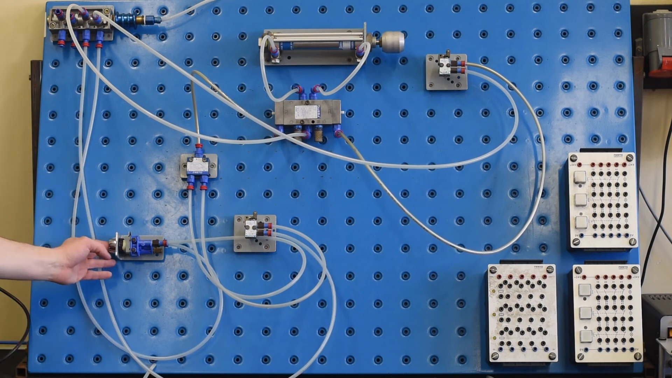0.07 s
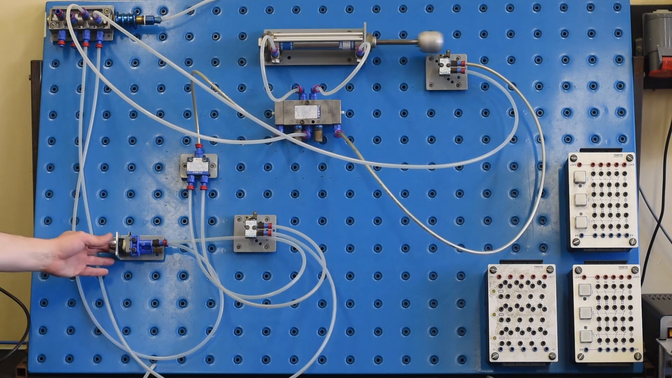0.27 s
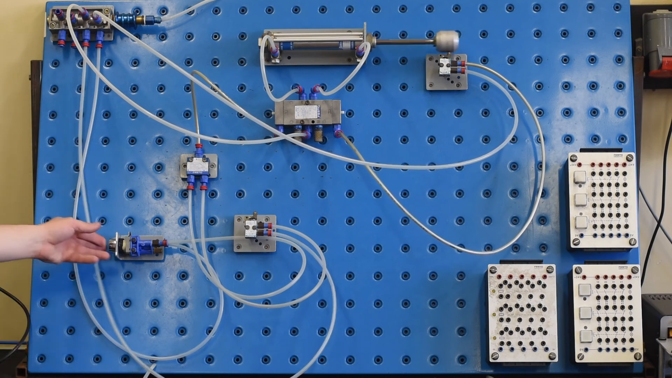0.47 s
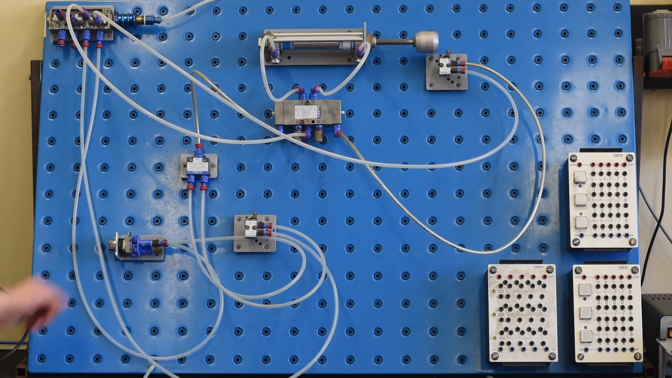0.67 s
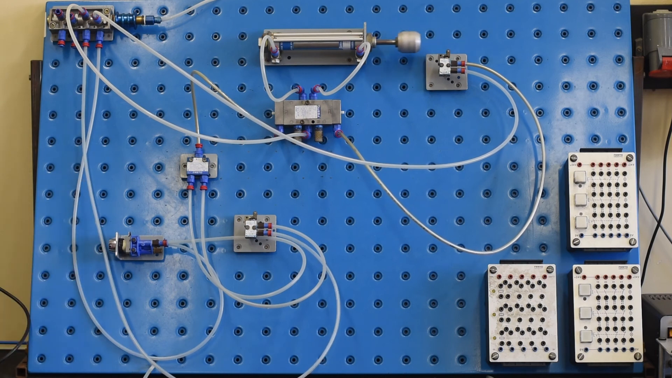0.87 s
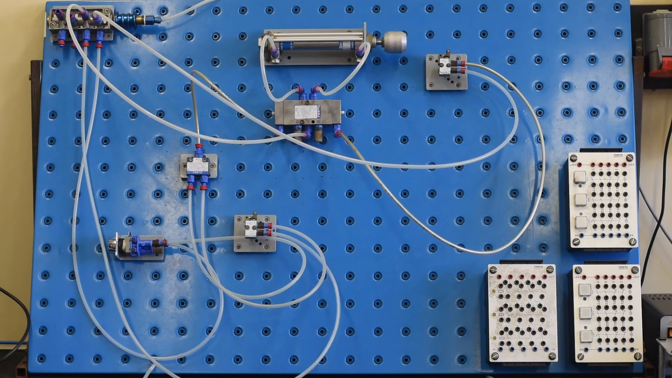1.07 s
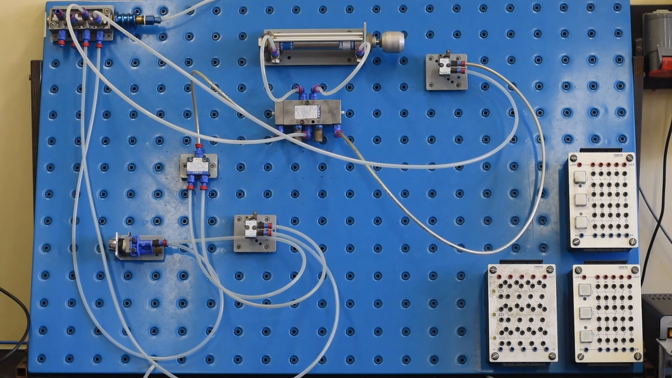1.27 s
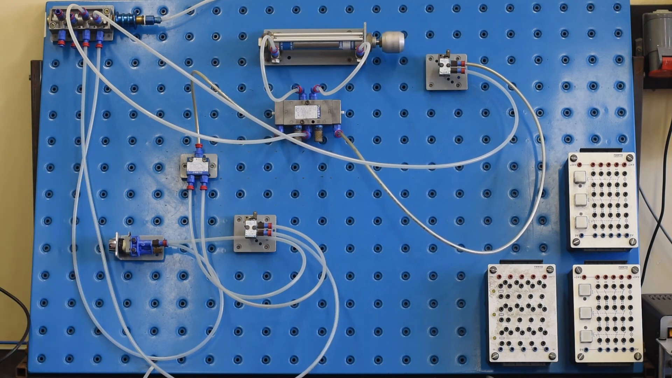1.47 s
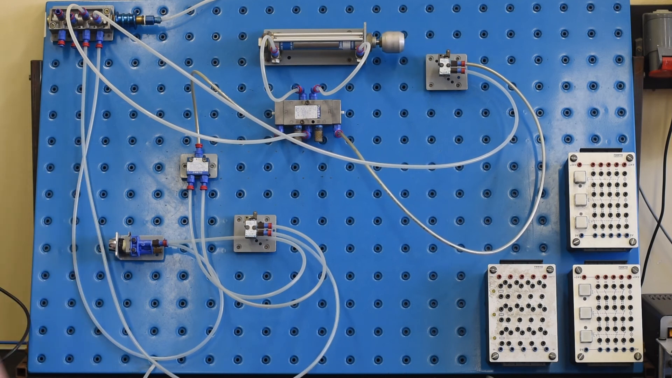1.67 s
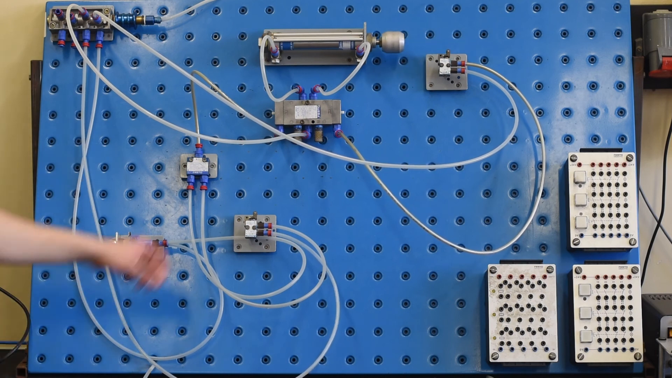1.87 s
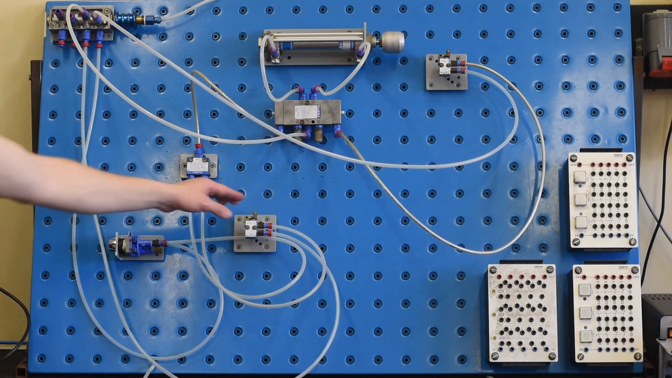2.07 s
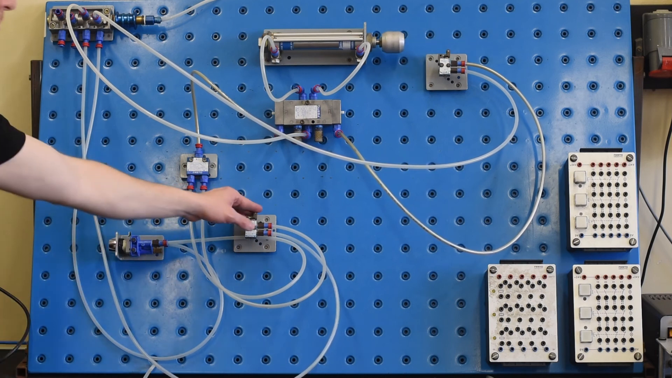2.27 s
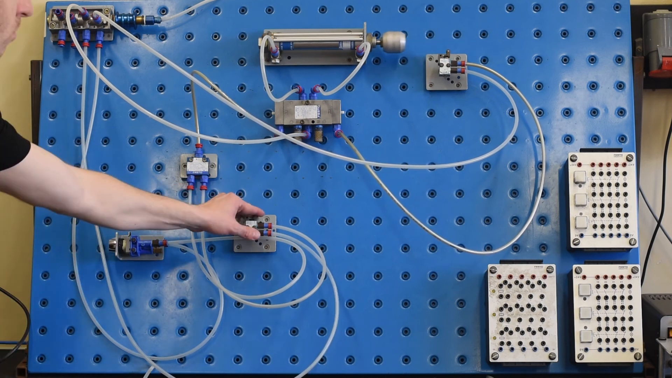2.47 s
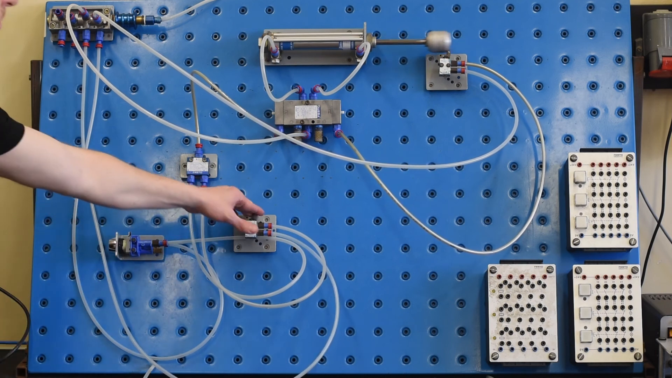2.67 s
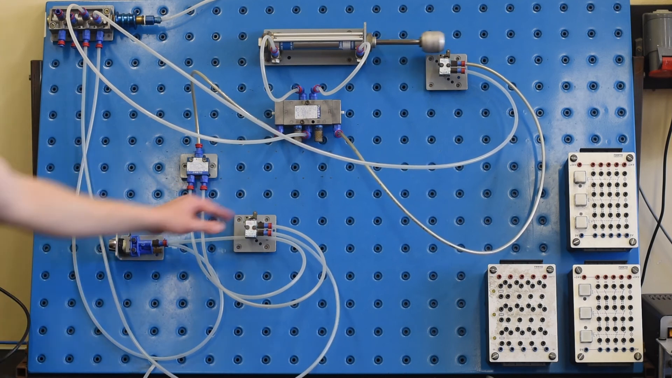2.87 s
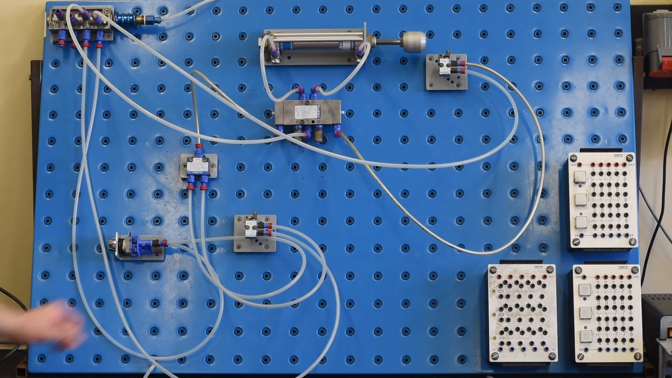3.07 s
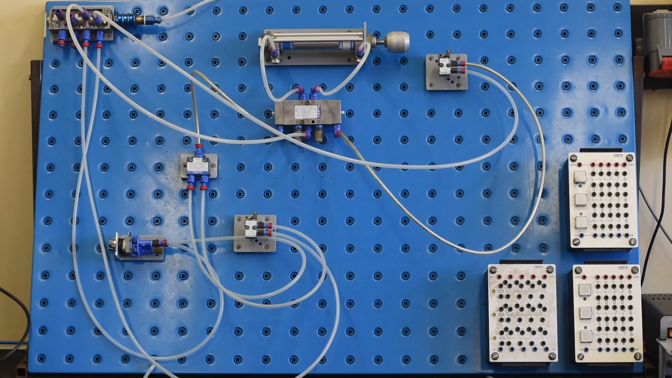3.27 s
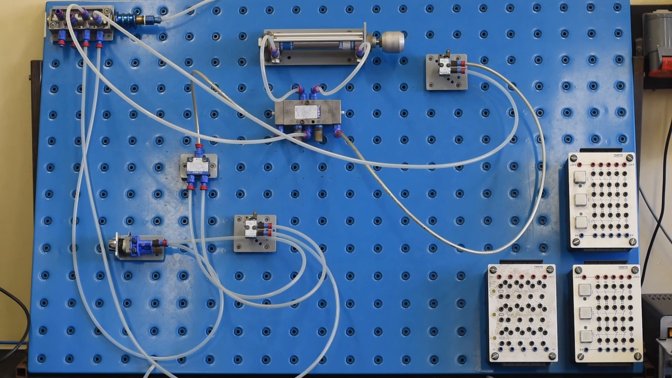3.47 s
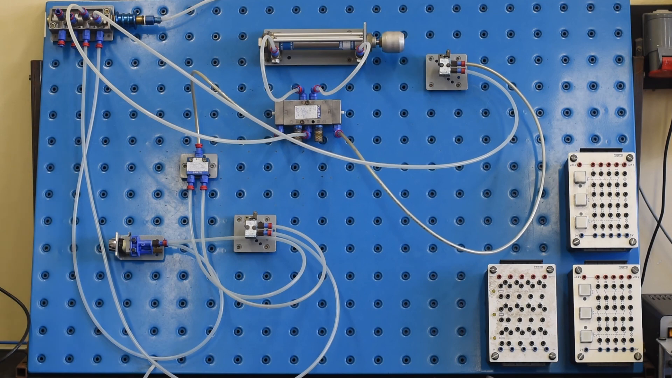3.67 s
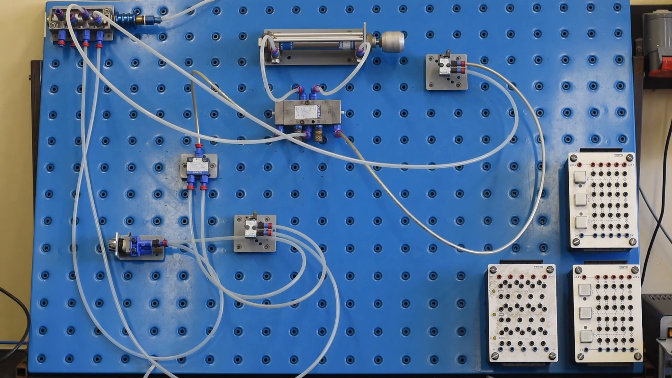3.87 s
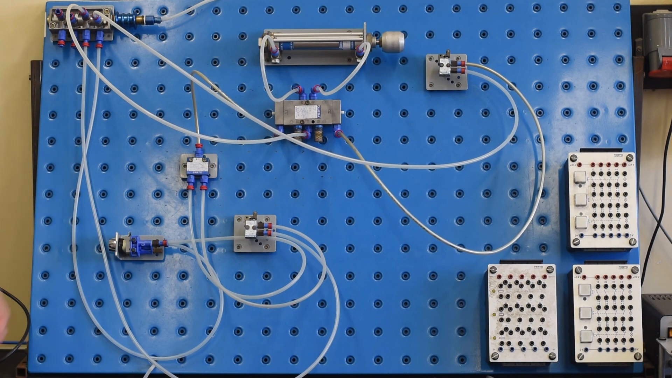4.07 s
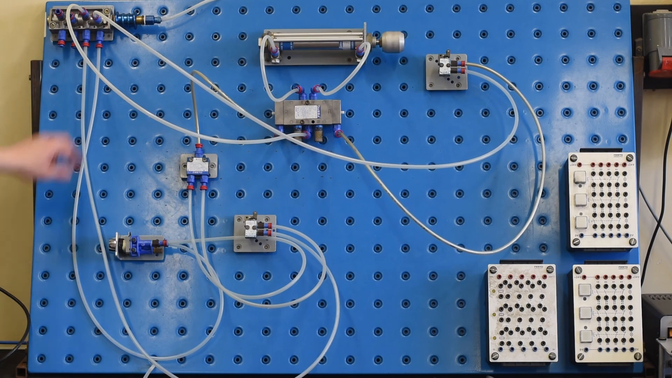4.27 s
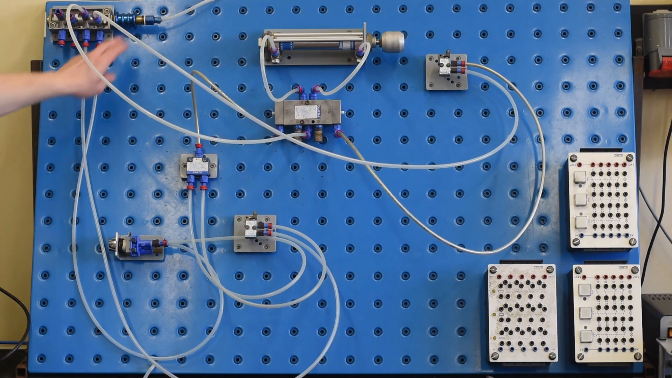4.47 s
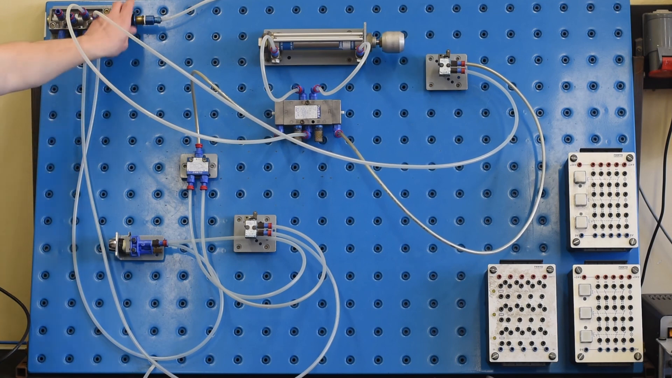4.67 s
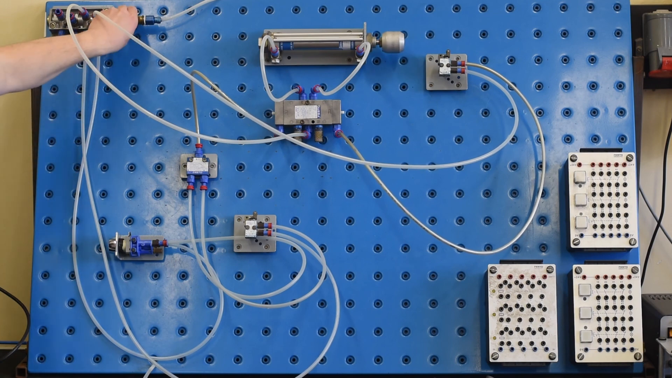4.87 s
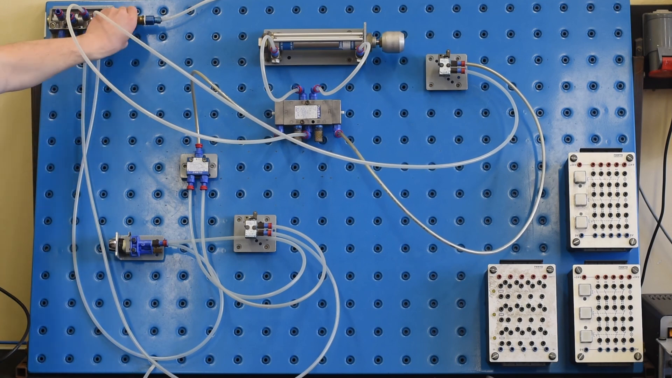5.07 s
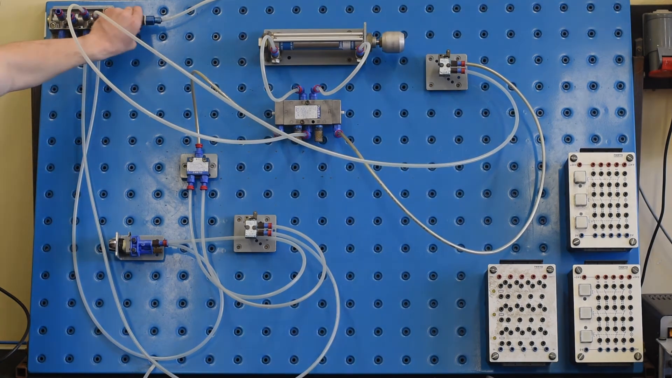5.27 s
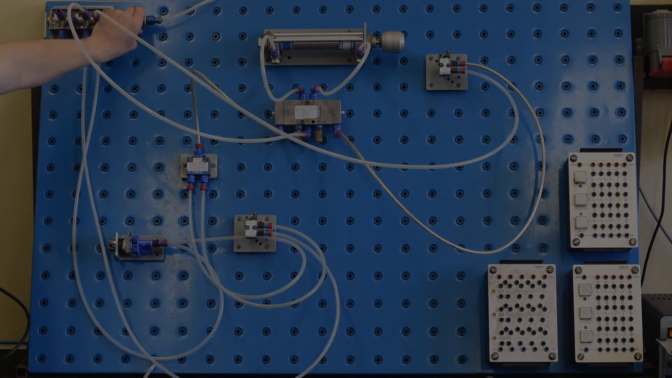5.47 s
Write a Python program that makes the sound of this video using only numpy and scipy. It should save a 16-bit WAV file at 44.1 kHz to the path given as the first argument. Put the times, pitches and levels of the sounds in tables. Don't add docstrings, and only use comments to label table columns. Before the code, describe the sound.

A hand works small valves on a perforated metal board in a reverberant lab. A sharp clack, thin hiss, end knock and air puff mark the cylinder's out-stroke; a softer knock marks its return. The cycle repeats with a brighter spit of air. Last, the supply valve vents in a very loud, distorted blast. A faint leak hiss and low room hum run underneath, heard in stereo from a few metres away.

```python
import sys
import numpy as np
from scipy import signal
from scipy.fft import rfft, irfft, next_fast_len
from scipy.io import wavfile
from scipy.ndimage import uniform_filter1d

SR = 44100
rng = np.random.default_rng(int(sys.argv[2]) if len(sys.argv) > 2 else 0)


def nominal_scale(level):
    x = np.asarray(level, float) / 20
    return 10 ** x


def dump_mix(stems):
    frames = np.atleast_2d(stems).T
    limited = np.clip(frames, -1, 1)
    pcm = np.round(limited * 32767).astype(np.int16)
    wavfile.write(sys.argv[1], SR, pcm)


N = 242535

# [f/Hz, level/dB per Hz]
WASH_COLOUR = [(15, -48), (25, -17), (102, -11), (182, -20), (204, -0.5), (337, -14), (364, -4.5),
               (505, -8.5), (612, -8), (728, -12), (2500, -12), (3250, -26), (5500, -120)]
LEAK_COLOUR = [(1180, -42), (2000, -24), (2120, -29), (2900, -7), (3210, -6), (4950, -5.5), (7420, -1),
               (11500, -13), (14700, -11), (15700, -13.5)]
WASH_DB, LEAK_DB = -56.5, -51
# [f/Hz, width/Hz, level/dB]
FAN_DRONE = (206, 14, -68)
# [middle t/s, level/dB, half length t/s]
RUMBLE_SWELLS = [
    (.6, -59, .4),
    (1.28, -56.5, .14),
    (1.7, -69, .3),
    (2.9, -56, 0.46),
    (3.5, -56, 0.14),
    (4.05, -66, .06),
    (4.73, -75, 0.073),
    (5.38, -66, .08),
]
# [middle t/s, level/dB, half length t/s]
RUSTLE_SWELLS = [
    (.3, -69, .5),
    (1.2, -61.5, 0.53),
    (2.2, -69, 0.14),
    (2.7, -59, 0.45),
    (3.7, -60.5, 0.51),
    (4.85, -63.5, 0.23),
    (5.35, -57, 0.21),
]
RUMBLE_REST_DB, RUSTLE_REST_DB = -77, -66.5
# [f/Hz, side minus mid level/dB]
FLOOR_WIDTH = [(60, -9), (180, -14), (550, -9), (1650, -8.5), (4970, -12.5), (15000, -5)]

# [f/Hz, t60/s]
ROOM_T60 = [(60, 2.05), (330, 1.03), (900, 1.023), (2300, 1.077), (4000, 0.94), (8000, 0.43), (15000, 0.27)]
# [f/Hz, t/s]
BUILD_UP = [(100, 0.017), (400, 0.0059), (1500, 0.0027), (6000, 0.0013)]
# [delay t/s, level/dB]
WALL_ECHOES = [(0.016, -14), (0.026, -28.5), (0.043, -7.5), (.06, -21.5), (0.086, -29)]
# [delay t/s, level/dB over the tail, fading t/s]
FAR_WALL = (0.068, 0.69, 0.0034)
# [f/Hz, side minus mid level/dB]
BOARD_WIDTH = [(60, -28), (150, -47), (380, -35), (950, -27.5), (2380, -16), (5980, -12.5), (15000, -5.5)]
SUPPLY_WIDTH = [(60, -24), (180, -25), (550, -30), (1650, -22), (4970, -10), (15000, -3)]

# [t/s, level/dB]
HAND_HITS = [
    (.015, -49),
    (.124, -32),
    (.129, -45),
    (.388, -26),
    (.4, -25.5),
    (2.275, -57),
    (2.41, -51),
    (2.492, -36),
    (2.4965, -38),
    (3.392, -45.5),
]
SPOOL_HITS = [
    (.133, -11.5),
    (2.499, -10.5),
]
OUT_HITS = [
    (.4495, -30.5),
    (.4575, -19),
    (2.7685, -21.5),
]
HOME_HITS = [
    (1.1755, -22),
    (3.4355, -22.5),
]
# [delay t/s, level/dB, sign]
SPOOL_REBOUNDS = [(0, -7, 1), (.0017, -3, -1), (.0045, -6.5, 1), (.0062, 0, 1), (.0075, -3.5, 1),
                  (.0088, -2, -1), (0.01, -4, 1), (0.0139, -3, 1), (0.0178, -13, 1)]
OUT_REBOUNDS = [(0, 9.4, 1), (.0015, 4.7, -1), (.0045, 6.2, 1), (.0085, 5.7, 1), (.012, 8, -1),
                (0.02, 3.6, 1), (.0262, 6, 1)]
HOME_REBOUNDS = [(0, 1.7, 1), (.0045, 1.1, -1), (.0075, 1.3, -1), (0.0095, 2, 1), (0.0116, 2.5, 1)]
# [f/Hz, level/dB per Hz]
HAND_COLOUR = [(80, -32), (200, -0.5), (350, 0), (800, -11), (1500, -12.5), (3000, -17), (6000, -60)]
SPOOL_COLOUR = [(53, -52), (90, -9.5), (154, -10), (275, -10), (353, -4), (500, -2), (606, -2.5),
                (810, -8.5), (1100, -6.5), (2450, -10.5), (2950, -21), (3700, -25), (4200, -33),
                (5450, -33), (6000, -39), (9000, -48), (11700, -71), (19800, -120)]
OUT_COLOUR = [(53, -72), (90, -27), (135, -14), (231, -12), (334, 1.5), (415, -6), (774, -7), (1070, -7.5),
              (1330, -15), (1470, -11), (2230, -11), (2870, -21.5), (5000, -32), (6500, -69), (11000, -120)]
HOME_COLOUR = [(100, -56), (170, -14), (335, 2), (432, -14), (599, -11), (740, -18.5), (877, -6),
               (969, -16), (1460, -12), (1760, -25.5), (1940, -11), (2260, -11), (3050, -24.5),
               (3450, -21.5), (4100, -35), (6500, -70), (11000, -120)]
# [f/Hz, width/Hz, level/dB]
SPOOL_MODES = [(340, 22, -1.5), (596, 105, 4.5), (1105, 34, 0.5), (1710, 17, -17), (2400, 22, -25),
               (5200, 1300, -15.5)]
OUT_MODES = [(360, 8.5, 6), (456, 10, -8), (586, 44, 14), (1160, 120, -13), (1860, 32, -27.5),
             (2370, 36, -21)]
HOME_MODES = [(368, 6.1, -4.5), (855, 34, -5.5), (1100, 61, -2), (1383, 70, -13), (1930, 73, -12),
              (2210, 110, -12.5), (3250, 100, -9)]
BASS_EDGE_HZ = 70
# [t/s, level/dB, f/Hz, width/Hz]
METAL_TICKS = [(0.1199, -31, 1100, 500), (0.1252, -32, 900, 120), (0.1362, -39, 5200, 1500),
               (.1395, -23.5, 5450, 300), (0.1412, -22, 5200, 350), (.142, -36, 11000, 8000),
               (.364, -36, 4405, 200), (2.502, -35, 5200, 1500), (2.506, -30, 5400, 300),
               (2.508, -24.5, 5200, 350), (2.506, -21, 11200, 8000), (2.516, -36, 5510, 1500),
               (3.937, -35.5, 2600, 900), (3.943, -40.5, 2100, 300)]

# [start t/s, end t/s, level/dB]
ROD_STROKES = [
    (.15, .43, -56),
    (2.513, 2.753, -48),
]
# [f/Hz, level/dB per Hz]
STROKE_JET = [(2000, -21), (4000, 4), (6000, -3), (9000, -3), (11000, -19), (15000, -25)]
BREAKAWAY_DB, BREAKAWAY_S = 15, .01
CUSHION_DB, CUSHION_S = 4.5, 0.023

# [t/s, peak level/dB, opening t/s, pressure t60/s, tilt/dB per octave]
EXHAUST_PUFFS = [
    (.36, -42.5, 0.0052, 0.33, -8.5),
    (.429, -36.5, 0.0081, 0.2, 0.5),
    (.447, -34, .005, 0.28, -7),
    (.601, -26.5, 0.0086, 0.13, -1.6),
    (2.746, -29, 0.0064, 0.14, -1),
    (2.874, -27.5, 0.0095, 0.14, -0.2),
]
PILOT_PUFFS = [
    (2.7535, -18.5, 0.0014, 0.13, -3.5),
    (2.764, -32, 0.0022, 0.13, 11),
    (2.797, -28, 0.0032, 0.085, 6),
]
SUPPLY_PUFFS = [
    (5.303, -30.5, 0.011, 0.38, 1.5),
    (5.318, -17, 0.0044, 0.23, -3),
    (5.3235, -9.5, 0.009, 0.12, 3),
    (5.379, -13, 0.0092, 0.26, -2.5),
]
# [f/Hz, level/dB per Hz]
EXHAUST_JET = [(300, -47), (1200, -4), (2600, -9), (3500, -3), (5600, -5), (9400, -4.5), (12500, -4.5),
               (15700, -9.5)]
PILOT_JET = [(710, -48), (1200, -7), (1940, -11), (2180, -9), (2840, 1), (3110, 5.5), (4250, -2.5),
             (4740, 0.5), (6370, -12), (9000, -21), (11700, -49), (19800, -120)]
SUPPLY_JET = [(24, -68), (40, -71), (352, -18.5), (389, -16.5), (500, -16), (610, -9), (745, -16),
              (845, -16.5), (1140, -9), (1390, -0.5), (1930, -8.5), (2300, -1.5), (2740, -4), (3880, -3.5),
              (15700, -21)]

# [start t/s, length t/s, level/dB]
OVERLOAD = (5.332, 0.031, -13)
# [f/Hz, level/dB per Hz]
SPLATTER_COLOUR = [(24, -39), (60, -17.5), (300, -9), (621, -7), (1200, -5.5), (1970, -6.5), (6260, -31),
                   (7680, -30), (9000, -29), (11700, -42), (19800, -120)]
SPLATTER_PER_S, OVERLOAD_SAG_DB_PER_S, OVERLOAD_EDGE_S = 530, 195, 0.0051


def evened(x):
    return x / np.sqrt(np.mean(x ** 2) + 1e-20)


def read(points, hz):
    f, value = np.transpose(points)
    return np.interp(np.log(hz + 1), np.log(f + 1), value)


def add(mix, s, sound):
    part = mix[round(s * SR):][:len(sound)]
    part += sound[:len(part)]


def coloured(x, points, tilt_db=0):
    hz = np.fft.rfftfreq(x.shape[-1], 1 / SR)
    gain = nominal_scale(read(points, hz) + tilt_db * np.log2((hz + 20) / 4000))
    return irfft(rfft(x) * gain, x.shape[-1])


def causal(points, size=4096):
    hz = abs(np.fft.fftfreq(size, 1 / SR))
    log_gain = np.log(nominal_scale(np.maximum(read(points, hz), -100)))
    spectrum = np.exp(np.conj(signal.hilbert(log_gain)))
    click = np.fft.ifft(spectrum).real[:size // 2]
    return click / np.linalg.norm(click)


def swells(rows, rest_db):
    t = np.arange(N) / SR
    return nominal_scale(rest_db) + sum(nominal_scale(db) * np.exp(-((t - s) / half) ** 2) for s, db, half in rows)


def background():
    wash, leak, drone, rumble, rustle = rng.standard_normal((5, 2, N))
    steady = nominal_scale(WASH_DB) * evened(coloured(wash, WASH_COLOUR))
    steady += nominal_scale(LEAK_DB) * evened(coloured(leak, LEAK_COLOUR))
    hz, width, db = FAN_DRONE
    steady += nominal_scale(db) * evened(signal.lfilter(*signal.iirpeak(hz, hz / width, SR), drone))
    rumble = coloured(rumble, [(50, -43), (85, -6.5), (105, 5.0), (130, -5.0), (200, -24)])
    rustle = coloured(rustle, [(60, -25), (200, -1.5), (400, -8.0), (1200, -6.5), (3000, -33), (8000, -60)])
    moving = swells(RUMBLE_SWELLS, RUMBLE_REST_DB) * evened(rumble)
    moving += swells(RUSTLE_SWELLS, RUSTLE_REST_DB) * evened(rustle)
    mid, side = steady + moving
    return np.array([mid, coloured(side, FLOOR_WIDTH)])


def room(tail_db):
    taps = np.zeros((2, 2 * SR))
    at = np.arange(200, 2 * SR - 20, 20) + rng.integers(0, 20, (2, (2 * SR - 201) // 20))
    np.put_along_axis(taps, at, rng.choice([-1., 1.], at.shape), 1)
    hz, t, z = signal.stft(taps, SR, nperseg=512)
    decay = nominal_scale(-60 * t / read(ROOM_T60, hz)[:, None])
    shape = decay * (1 - np.exp(-t / abs(read(BUILD_UP, hz))[:, None]))
    z *= shape
    z *= np.linalg.norm(shape, axis=-1, keepdims=True) / np.linalg.norm(z, axis=-1, keepdims=True)
    tail = signal.istft(z, SR, nperseg=512)[1]
    delay, lift_db, fading = FAR_WALL
    late = np.arange(tail.shape[1]) / SR - delay
    tail *= nominal_scale(lift_db * (late > 0) * np.exp(-np.maximum(late, 0) / fading))

    early = np.zeros((2, SR // 4))
    signs = rng.choice([-1., 1.], (len(WALL_ECHOES), 2))
    paths = [(0.00071, 0.017)] + list(WALL_ECHOES)
    for (s, db), sign in zip(paths, [np.ones(2), *signs]):
        early[:, round(s * SR)] += sign * nominal_scale(db)
    return early, nominal_scale(tail_db) * tail / np.linalg.norm(tail[0])


def heard(direct, diffuse, paths, width):
    sources = zip((direct, diffuse), paths)
    mid, side = sum(signal.fftconvolve(x[None], path, axes=1)[:, :N] for x, path in sources)
    quadrature = signal.hilbert(coloured(side, width), next_fast_len(N)).imag[:N]
    return np.array([mid, quadrature])


def blows(hits, rebounds, colour, modes, ring_db, bass_db, direct_db):
    t = np.arange(8192) / SR
    ring = sum(nominal_scale(db) * np.sqrt(width) * np.exp(-np.pi * width * t) * np.sin(2 * np.pi * hz * t)
               for hz, width, db in modes)
    body = nominal_scale(ring_db) * ring / np.linalg.norm(ring)
    add(body, 0, causal(colour))

    pattern = np.zeros(2048)
    for delay, db, sign in rebounds:
        scatter = .45 * rng.standard_normal(600) * nominal_scale(-60 * t[:600] / .01)
        scatter[0] = np.sign(sign)
        add(pattern, delay, nominal_scale(db) * scatter / np.linalg.norm(scatter))

    strikes = np.zeros(N)
    for s, db in hits:
        strikes[round(s * SR)] = nominal_scale(db + 15.5)
    single = signal.oaconvolve(strikes, body)[:N]
    direct = nominal_scale(direct_db) * signal.oaconvolve(single, pattern)[:N]
    bass = signal.lfilter(*signal.butter(1, 700, fs=SR), direct)
    direct = direct - (1 - nominal_scale(bass_db)) * bass
    return np.array([direct, np.linalg.norm(pattern) * single])


def ticks():
    out, t = np.zeros(N), np.arange(400) / SR
    for s, db, hz, width in METAL_TICKS:
        add(out, s, nominal_scale(db) * np.exp(-np.pi * width * t) * np.sin(2 * np.pi * hz * t))
    return out


def stroke():
    t, gain = np.arange(N) / SR, np.zeros(N)
    for start, end, db in ROD_STROKES:
        breakaway = BREAKAWAY_DB * np.exp(-abs(t - start) / BREAKAWAY_S)
        cushion = CUSHION_DB * np.exp(-abs(end - t) / CUSHION_S)
        gain += (t > start) * (t < end) * nominal_scale(db + breakaway + cushion)
    hiss = evened(coloured(rng.standard_normal((2, N)), STROKE_JET))
    mid, side = uniform_filter1d(gain, size=441) * hiss
    return np.array([mid, coloured(side, BOARD_WIDTH)])


def puffs(rows, jet, flutter_db, choked_s):
    out, t = np.zeros(N), np.arange(SR // 2) / SR
    for s, db, opening, t60, tilt_db in rows:
        noise, flutter = rng.standard_normal((2, len(t)))
        flutter = evened(uniform_filter1d(flutter, size=90))
        drain_db = -60 * np.maximum(t - choked_s, 0) / t60
        flow = np.minimum(t / opening, 1) ** 2 * nominal_scale(db + drain_db + flutter_db * flutter)
        add(out, s, flow * evened(coloured(noise, jet, tilt_db)))
    return out


def splatter():
    spikes = rng.standard_normal((2, N)) * (rng.random((2, N)) < SPLATTER_PER_S / SR)
    start, length, db = OVERLOAD
    t = np.arange(N) / SR - start
    gate = np.clip(np.minimum(t, length - t) / OVERLOAD_EDGE_S + 1, 0, 1) ** 2
    level = nominal_scale(db - OVERLOAD_SAG_DB_PER_S * np.clip(t, 0, length))
    return gate * level * evened(coloured(spikes, SPLATTER_COLOUR))


def scene():
    board = blows(HAND_HITS, HOME_REBOUNDS[:2], HAND_COLOUR, HOME_MODES, ring_db=-5, bass_db=4.0, direct_db=0.5)
    board += blows(SPOOL_HITS, SPOOL_REBOUNDS, SPOOL_COLOUR, SPOOL_MODES,
                   ring_db=-10.5, bass_db=-1.0, direct_db=4.0)
    board += blows(OUT_HITS, OUT_REBOUNDS, OUT_COLOUR, OUT_MODES, ring_db=-22.5, bass_db=-3.5, direct_db=2.0)
    board += blows(HOME_HITS, HOME_REBOUNDS, HOME_COLOUR, HOME_MODES, ring_db=-10.0, bass_db=-38, direct_db=5.0)
    board = signal.lfilter(*signal.butter(4, BASS_EDGE_HZ, "high", fs=SR), board)
    board += ticks() * nominal_scale([[3.5], [-8]])

    ports = puffs(EXHAUST_PUFFS, EXHAUST_JET, flutter_db=2.0, choked_s=0.028)
    ports += puffs(PILOT_PUFFS, PILOT_JET, flutter_db=1.5, choked_s=0.0035)
    ports *= nominal_scale(3.0)
    supply = puffs(SUPPLY_PUFFS, SUPPLY_JET, flutter_db=0.5, choked_s=0.0075)

    mix = background() + stroke()
    mix += heard(*board, room(tail_db=3), BOARD_WIDTH)
    mix += heard(ports, ports, room(tail_db=-2.5), BOARD_WIDTH)
    mix += heard(supply, supply, room(tail_db=-1.5), SUPPLY_WIDTH)
    mid, side = mix
    return np.array([mid + side, mid - side])


def roll_off(x):
    return signal.sosfilt(signal.butter(12, 15890, fs=SR, output="sos"), x)


def record(dry):
    mix = np.clip(dry + splatter(), -1, 1)
    return roll_off(mix)


dry = scene()
out = record(dry)
dump_mix(out)
```